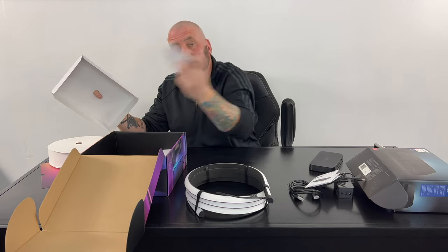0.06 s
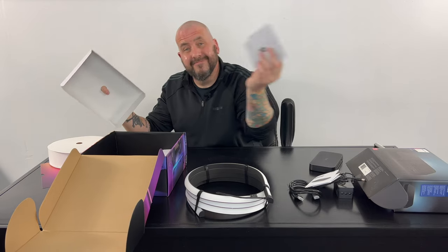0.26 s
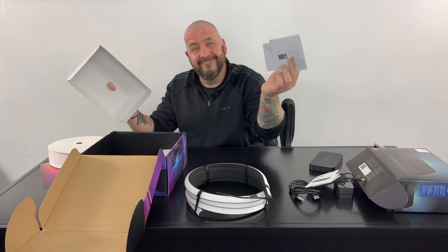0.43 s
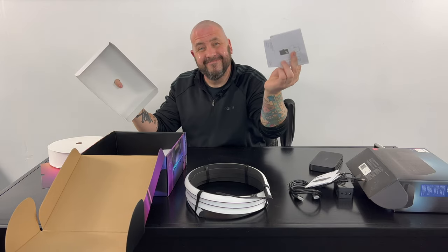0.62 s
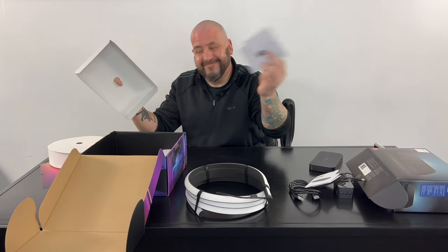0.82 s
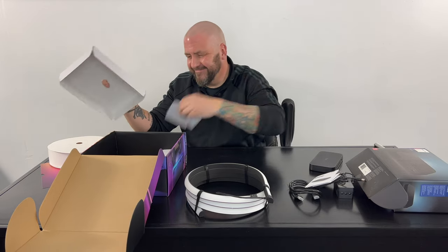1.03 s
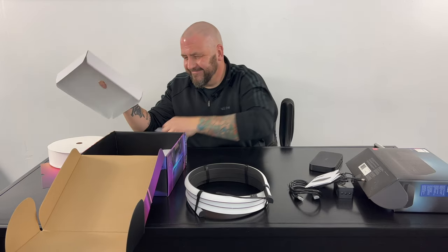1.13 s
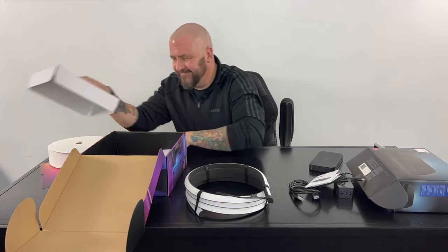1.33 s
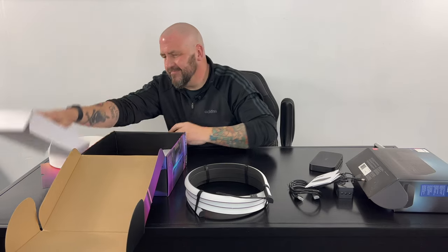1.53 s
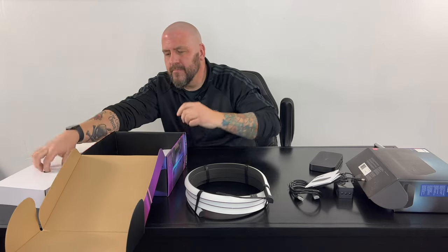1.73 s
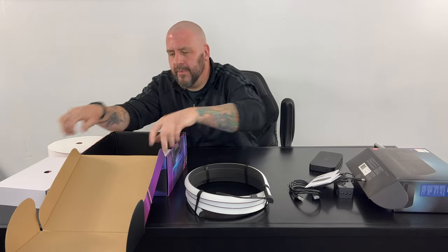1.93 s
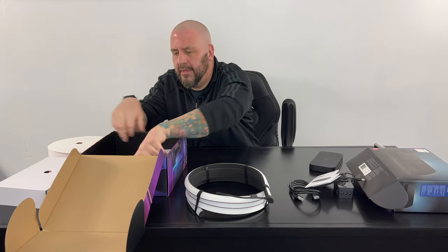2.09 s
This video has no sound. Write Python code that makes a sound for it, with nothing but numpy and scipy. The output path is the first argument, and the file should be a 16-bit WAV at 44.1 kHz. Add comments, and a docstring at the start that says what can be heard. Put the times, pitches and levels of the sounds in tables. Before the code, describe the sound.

A light cardboard box insert lands edge first and slaps flat on a desk with a loud, hollow crack. Faint paper flicks come before, a hand knocks the box after, in a small bare room.

```python
"""A hollow cardboard insert is tossed onto a desk in a small, bare room: its edge lands and skids as
gritty noise bursts, air puffs out as low tones, its face slaps flat and the tray rings as sine modes.
Before it, paper cards are flicked and put down; after it, a hand brushes and knocks the open box:
grainy noise through resonant colours, with dull sine bumps from the desk.
A low rumble of coloured noise lies underneath."""
import sys
import numpy as np
from scipy import signal
from scipy.fft import rfft, irfft, next_fast_len
from scipy.io import wavfile
from scipy.ndimage import uniform_filter1d, map_coordinates

SR = 44100
rng = np.random.default_rng(int(sys.argv[2]) if len(sys.argv) > 2 else 0)


def dump_mix(stems):
    """Bounce the given channels to the path in sys.argv[1] as a 16-bit WAV at rate SR."""
    frames = np.atleast_2d(stems).T  # one column per channel
    limited = np.clip(frames, -1, 1)  # hard clip at full scale
    pcm = np.round(limited * 32767).astype(np.int16)
    wavfile.write(sys.argv[1], SR, pcm)


N = 95123
T = np.arange(N) / SR  # time in seconds

# Room rumble colour. Each row: frequency in Hz, relative level in dB.
RUMBLE_COLOUR = [(25, -33), (50, -18), (80, -10), (117, -9), (170, -16), (270, -20), (380, -31),
                 (520, -38.5), (800, -52), (1150, -73), (1950, -62.5), (2800, -81.5), (5000, -110)]
# Room decay. Each row: frequency in Hz, time to fall 60 dB in seconds, before any tail_share.
ROOM_DECAY = [(100, 0.48), (500, .46), (1200, 0.3), (3000, 0.36), (6000, 0.32), (9000, 0.24), (14000, 0.11)]
# Width of the room tail. Each row: frequency in Hz, side over mid as a ratio.
ROOM_WIDTH = [(100, .15), (250, .6), (500, 0.86), (1500, 1.49), (5000, .9), (14000, 0.83)]
# Noise suppressor. Each row: frequency in Hz, threshold in dB.
SUPPRESSOR_THRESHOLD = [(100, -100), (600, -97.5), (1200, -112), (3000, -111), (8000, -71), (10300, -102),
                        (13000, -113)]
# Dull bumps through the desk. Each row: peak time in seconds, frequency in Hz, level in dB,
# rise in seconds, 60 dB fall in seconds.
DESK_BUMPS = [(.11, 120, -49.5, 0.052, .15), (0.366, 118, -50, 0.038, .12), (.5, 111.2, -42, 0.05, 0.16),
              (1.006, 114, -43, 0.077, 0.077), (1.142, 113, -46, 0.041, 0.073),
              (1.22, 118, -51.5, 0.022, 0.2), (1.441, 100.4, -49.5, 0.032, 0.39),
              (2.074, 106, -39.5, 0.017, 0.27)]
# Light knocks on box and desk. Each row: peak time in seconds, level in dB, rise in seconds,
# 60 dB fall in seconds, left over right in dB, main resonance in Hz, extra crack in dB.
LIGHT_KNOCKS = [(.977, -55.5, .004, 0.12, 4.5, 595, 0.5), (1.144, -64, 0.0099, 0.11, 3, 620, -15),
                (1.299, -64, 0.018, 0.32, 4.5, 370, -11), (1.391, -50, .005, 0.1, 3.5, 292, -8),
                (1.936, -37.5, 0.0028, 0.049, 3.5, 2765, 15), (1.946, -40, 0.009, 0.06, 3.5, 293, -13),
                (2.113, -21, 0.0028, 0.057, 2, 585, -1), (2.128, -32.5, 0.0025, 0.094, 5.5, 300, 7.5)]
# Common colour of the knocks. Each row: frequency in Hz, relative level in dB.
KNOCK_BODY = [(60, -23), (150, -1), (300, 0.5), (560, -1.5), (700, -4), (1000, -11), (1300, -25),
              (1650, -8.5), (2200, -22.5), (2800, -19.5), (5000, -21.5), (9000, -44.5), (14000, -38.5)]
# Paper and fingers sliding. Each row: peak time in seconds, level in dB, rise in seconds,
# 60 dB fall in seconds, left over right in dB, main resonance in Hz, extra fizz in dB.
PAPER_SLIDES = [(0.014, -62.5, 0.054, .2, 5.5, 5760, 11), (0.07, -34, 0.02, 0.1, 3, 4040, -0.5),
                (0.085, -38, .002, 0.016, 12, 6070, -6), (.118, -49, 0.049, 0.082, 0, 2070, 0),
                (.386, -78, 0.0043, .06, 9, 3680, -15), (0.428, -68.5, .002, 0.085, 1, 3160, -11),
                (0.894, -66.5, 0.051, 0.12, 8, 12200, -4), (0.909, -63, 0.017, .12, 15.5, 5100, -12),
                (1.035, -66, 0.032, 0.096, 9.5, 7900, 7), (1.119, -70.5, 0.023, 0.053, 15.5, 3730, -27),
                (1.16, -57, 0.011, 0.14, 10.5, 14500, 37), (1.191, -55, 0.046, 0.16, 9, 3800, -1),
                (1.274, -51.5, 0.09, 0.067, 10, 5280, -5), (1.301, -49, 0.0094, 0.075, 14.5, 4080, -21),
                (1.386, -58.5, .012, 0.29, 10.5, 5500, 6.5), (1.533, -64, .02, .12, 15, 3640, -14.5),
                (1.599, -47.5, 0.0082, 0.0088, 9, 5460, -27), (2.005, -45.5, .003, 0.034, 5, 7500, 19),
                (2.053, -30, 0.029, 0.057, 3, 5410, -1), (2.074, -40.5, 0.018, 0.27, 6, 6200, -8),
                (2.145, -41, 0.028, 0.063, 2, 5560, 16)]
# Common colour of the paper. Each row: frequency in Hz, relative level in dB.
PAPER_BODY = [(300, -19.5), (1200, -44.5), (2100, -15.5), (2700, -22), (3500, -5.5), (5500, -3),
              (8000, -0.5), (10300, -20), (12500, -3), (15500, -11)]
# The insert's edge landing and skidding. Each row: peak time in seconds, level in dB,
# rise in seconds, 60 dB fall in seconds.
EDGE_LANDINGS = [(1.623, -18, 0.02, .08), (1.634, -17.5, 0.02, 0.042), (1.67, -16, 0.026, 0.15)]
# Colour of the edge. Each row: frequency in Hz, relative level in dB.
EDGE_BODY = [(29, -66), (50, -27.5), (134, -9.5), (196, -4), (268, -5.5), (433, -9.5), (500, -1.5),
             (699, -3), (910, -6), (1660, -16), (4320, -13), (8460, -18.5), (9770, -33.5), (11800, -22.5),
             (15400, -22.5)]
# The air cushion under the tray. Each row: peak time in seconds, frequency in Hz, level in dB,
# rise in seconds, 60 dB fall in seconds.
AIR_CUSHION = [(1.654, 281.3, -19, 0.038, 0.16), (1.696, 483, -21.5, 0.02, .05)]
# The face slapping down. Each row: peak time in seconds, level in dB, rise in seconds,
# 60 dB fall in seconds.
FACE_SLAPS = [(1.686, -2, 0.0094, 0.038), (1.697, -17.5, 0.0052, 0.028)]
# Colour of the slap. Each row: frequency in Hz, relative level in dB.
SLAP_BODY = [(35, -69.5), (70, -40), (150, -26.5), (240, -16.5), (340, -10), (490, -4), (620, -7),
             (800, -14.5), (1020, -8), (1260, -12.5), (1620, -7), (1790, -5), (2020, -8), (2280, -8.5),
             (2960, -7), (3830, -7.5), (5200, -11), (6680, -13), (8040, -19), (10400, -44), (12500, -29.5),
             (15400, -45)]
# The tray's ringing modes. Each row: frequency in Hz, relative level in dB, 60 dB fall in seconds.
TRAY_MODES = [(447.5, -7.5, 0.44), (487, 2, 0.38), (515, -11, 0.54), (577.5, -5, 0.38), (644, -7, 0.29),
              (750, -7, 0.31), (1174, -1, 0.13), (1301, -6, 0.3), (1512, 1.5, 0.15), (1710, -3, 0.2),
              (1827, -1, 0.28), (2284, 5, 0.097), (2754, -10, 0.33), (3380, -10, 0.18), (3810, -3.5, 0.19),
              (5190, -17, 0.22)]

RUMBLE_DB, RUMBLE_WIDTH = -59.5, 0.33  # mid level, side over mid
RUMBLE_SWAY_DB, RUMBLE_SWAY_RATE = 1, 14  # rate in random knots per second
ROOM_GAP_S, LEFT_LEAD_S = .004, .00003  # fade-in of the tail, head start of the left direct sound
KNOCK_PEAK_DB, KNOCK_PEAK_WIDTH_HZ, CRACK_HZ = 8.5, 93, 1480
PAPER_PEAK_DB, PAPER_PEAK_WIDTH_HZ, FIZZ_HZ = 12, 310, 9100
PAPER_TAIL = 0.55  # share of the room's decay time
TRAY_DB, TRAY_ATTACK_S = -20.5, 0.0023
FLUTTER_RAD, FLUTTER_RATE = 0.6, 44  # phase wander, random knots per second
CLIP_TOP, TOP_HZ = 0.86, 15700  # full scale is 1


def amp(db):
    """Decibels to amplitude."""
    return 10 ** (np.asarray(db) / 20)


def unit(x):
    """Scale to an rms of 1."""
    return x / np.sqrt(np.mean(x ** 2) + 1e-20)


def along(points, hz):
    """Read a curve of (Hz, value) points on a log frequency axis."""
    f, v = np.transpose(points)
    return np.interp(np.log(hz + 1), np.log(f + 1), v)


def filtered(x, response):
    """Shape x by a function of frequency."""
    size = next_fast_len(N + SR // 2)
    spectrum = rfft(x, size) * response(np.fft.rfftfreq(size, 1 / SR))
    return irfft(spectrum, size)[..., :N]


def noise(colour):
    """Coloured noise of rms 1."""
    return unit(filtered(rng.standard_normal(N), lambda hz: amp(along(colour, hz))))


def wobble(rate):
    """A smooth random curve with rate knots a second."""
    return map_coordinates(rng.standard_normal(1024), [T * rate], mode="wrap")


def body(colour, size=2048):
    """Minimum-phase impulse response of a colour, energy 1: the energy comes as early as it can."""
    log_gain = np.log(amp(along(colour, np.fft.rfftfreq(size, 1 / SR))))
    cepstrum = irfft(log_gain)
    # folding the cepstrum forward in time makes the response causal
    cepstrum[1:size // 2] *= 2
    cepstrum[size // 2 + 1:] = 0
    response = irfft(np.exp(rfft(cepstrum)))
    return response / np.linalg.norm(response)


def accented(colour, peak_hz, width_hz, peak_db, shelf_hz, shelf_db):
    """A colour with one resonance and a treble shelf added in dB."""
    hz = np.fft.rfftfreq(2048, 1 / SR)
    peak = peak_db / (1 + ((hz - peak_hz) / width_hz) ** 2)
    shelf = shelf_db * (1 - 1 / (1 + (hz / shelf_hz) ** 4))
    return np.column_stack([hz, along(colour, hz) + peak + shelf])


def swell(s, rise, fall):
    """Climbs from silence to a peak at s, about the last 30 dB within rise, then dies 60 dB in fall."""
    climb = np.clip(1 + (T - s) / (1.3 * rise), 0, 1) ** 2.4
    return climb * amp(-60 * np.maximum(T - s, 0) / fall)


def contact(s, db, rise, fall, colour, grain_db):
    """A cluster of tiny impacts of uneven size, sounding through a body."""
    grain_level = np.repeat(rng.standard_normal(N), 16)[:N]  # a new size every 16 samples
    grains = unit(rng.standard_normal(N) * amp(grain_db * grain_level))
    return amp(db) * signal.fftconvolve(grains * swell(s, rise, fall), body(colour))[:N]


def thump(s, hz, db, rise, fall):
    """One low resonance, a sine swelling and dying."""
    return amp(db) * swell(s, rise, fall) * np.sin(2 * np.pi * hz * (T - s))


def room_tail(tail_share):
    """Diffuse stereo reverberation: noise whose bands each die at their own pace."""
    hz, t, z = signal.stft(rng.standard_normal((2, SR * 2 // 3)), SR, nperseg=256)
    z[1] *= along(ROOM_WIDTH, hz)[:, None]
    decay = amp(-60 * t / (tail_share * along(ROOM_DECAY, hz))[:, None])
    mid, side = signal.istft(z * decay, SR, nperseg=256)[1]
    fade_in = 1 - np.exp(-(T[:len(mid)] / ROOM_GAP_S) ** 2)
    tail = np.array([mid + side, mid - side]) * fade_in
    return tail / np.linalg.norm(tail[0])


def placed(x, pan_db, wet_db, tail_share=1):
    """A sound in the room: direct path plus tail, with pan_db as left over right."""
    wet = signal.fftconvolve(x[None], room_tail(tail_share), axes=1)[:, :N]
    sides = np.array([[.5], [-.5]])  # left, right
    direct = filtered(x, lambda hz: np.exp(2j * np.pi * hz * LEFT_LEAD_S * sides))
    return amp(pan_db * sides) * (direct + amp(wet_db) * wet)


def rumble():
    """The room's low, nearly central background noise, swaying a little in level."""
    mid = noise(RUMBLE_COLOUR)
    side = RUMBLE_WIDTH * noise(RUMBLE_COLOUR)
    level = amp(RUMBLE_DB + RUMBLE_SWAY_DB * wobble(RUMBLE_SWAY_RATE))
    return level * np.array([amp(-0.5) * (mid + side), amp(-2.0) * (mid - side)])


def bumps():
    """Hands bump the desk, each time stirring one dull low resonance."""
    return placed(sum(thump(*row) for row in DESK_BUMPS), pan_db=4.5, wet_db=-20)


def knocks():
    """Hands knock box and desk: grainy blows, each with its own resonance and crack."""
    out = np.zeros((2, N))
    for *blow, pan_db, hz, crack_db in LIGHT_KNOCKS:
        colour = accented(KNOCK_BODY, hz, KNOCK_PEAK_WIDTH_HZ, KNOCK_PEAK_DB, CRACK_HZ, crack_db)
        out += placed(contact(*blow, colour, grain_db=2.0), pan_db, wet_db=-6.5)
    return out


def paper():
    """Cards and fingers slide in short, gritty strokes, each with its own resonance and fizz."""
    out = np.zeros((2, N))
    for *stroke, pan_db, hz, fizz_db in PAPER_SLIDES:
        colour = accented(PAPER_BODY, hz, PAPER_PEAK_WIDTH_HZ, PAPER_PEAK_DB, FIZZ_HZ, fizz_db)
        sliding = contact(*stroke, colour, grain_db=2.5)
        out += placed(sliding, pan_db, wet_db=-8.5, tail_share=PAPER_TAIL)
    return out


def edge():
    """The insert's edge lands and skids: rough contacts through the cardboard's body."""
    landing = sum(contact(*row, EDGE_BODY, grain_db=3) for row in EDGE_LANDINGS)
    return placed(landing, pan_db=1.5, wet_db=0.5)


def air():
    """Air squeezed out from under the tray booms as low resonances."""
    return placed(sum(thump(*row) for row in AIR_CUSHION), pan_db=-1.5, wet_db=-14.5)


def slap():
    """The face slaps flat: dense grains in short, bright bursts."""
    hit = sum(contact(*row, SLAP_BODY, grain_db=2.5) for row in FACE_SLAPS)
    return placed(hit, pan_db=4.5, wet_db=-4.5)


def ring():
    """The slap sets off the tray's modes: decaying sines whose phases wander at random."""
    age = np.maximum(T - FACE_SLAPS[0][0], 0)  # seconds since the first slap's peak
    modes = np.zeros(N)
    for hz, db, t60 in TRAY_MODES:
        phase = 2 * np.pi * hz * age + FLUTTER_RAD * wobble(FLUTTER_RATE)
        modes += amp(db - 60 * age / t60) * np.sin(phase)
    attack = 1 - np.exp(-age / TRAY_ATTACK_S)
    return placed(amp(TRAY_DB) * modes * attack, pan_db=-2.0, wet_db=-7.5)


def insert():
    """The edge lands, air is squeezed out, the face slaps and the tray rings."""
    return edge() + air() + slap() + ring()


def scene():
    """Everything in the room, from the background to the insert."""
    return rumble() + bumps() + knocks() + paper() + insert()


def suppressed(x, size=3):
    """A noise suppressor turns down each band that falls under its threshold."""
    hz, _, z = signal.stft(x, SR, nperseg=512)
    # both channels share one gain, smoothed over size frames
    power = np.abs(uniform_filter1d(np.mean(np.abs(z) ** 2, axis=0), size, axis=1))
    threshold = amp(along(SUPPRESSOR_THRESHOLD, hz))[:, None]
    gain = power / (power + threshold ** 2)
    return signal.istft(z * gain, SR, nperseg=512)[1][:, :N]


def record(dry):
    """Faint sounds and tails are thinned band by band, peaks rounded off, all above TOP_HZ cut steeply."""
    thinned = suppressed(dry)
    clipped = thinned / (1 + (thinned / CLIP_TOP) ** 8) ** (1 / 8)  # stays below CLIP_TOP
    return filtered(clipped, lambda hz: 1 / (1 + (hz / TOP_HZ) ** 150))


dry = scene()
out = record(dry)
dump_mix(out)
```